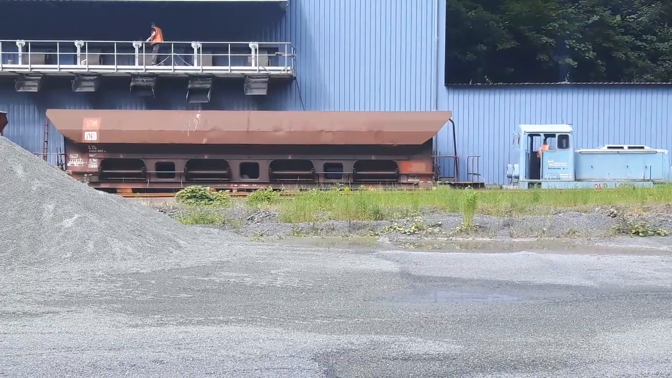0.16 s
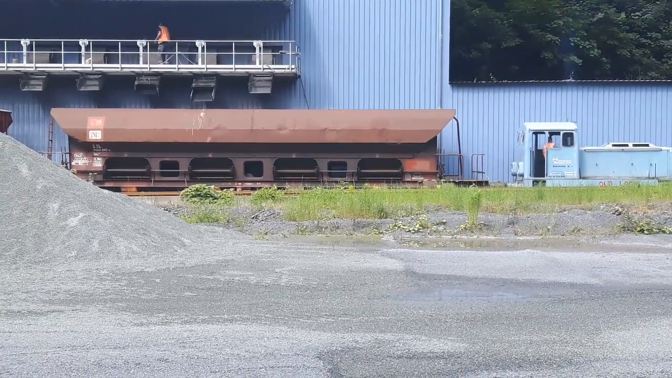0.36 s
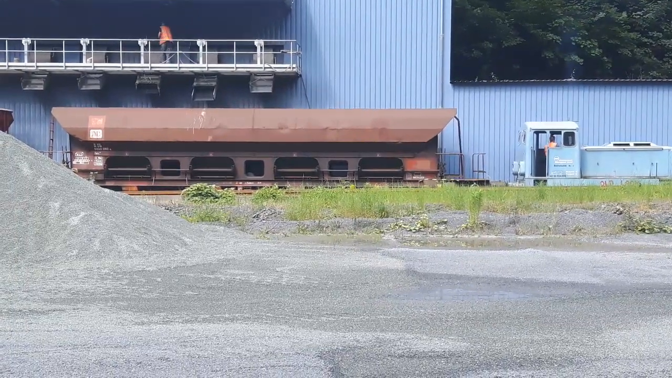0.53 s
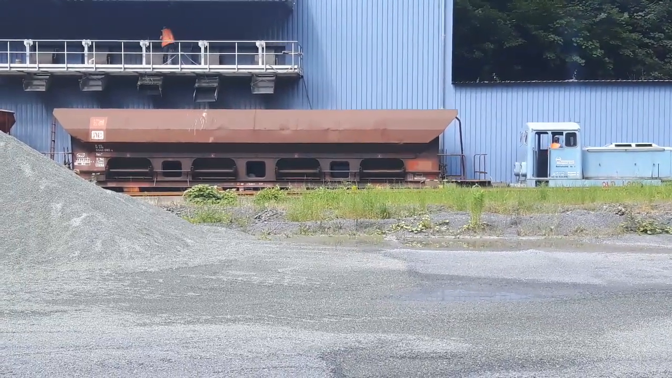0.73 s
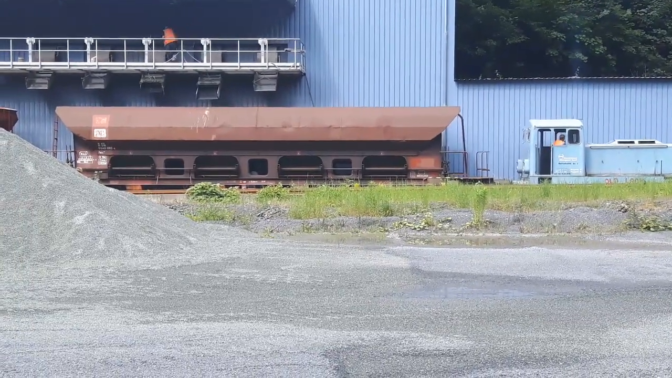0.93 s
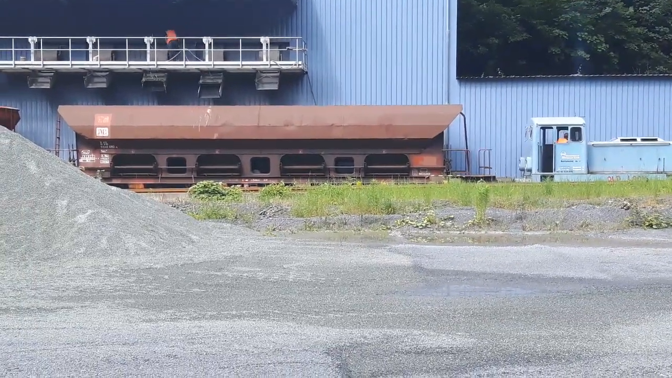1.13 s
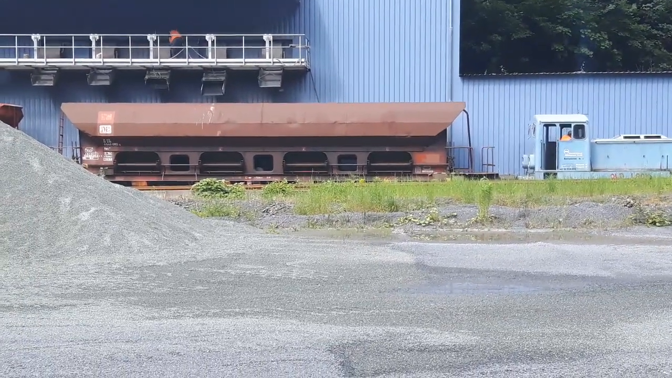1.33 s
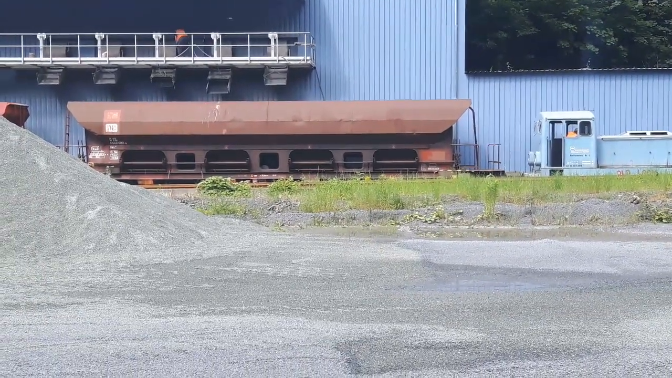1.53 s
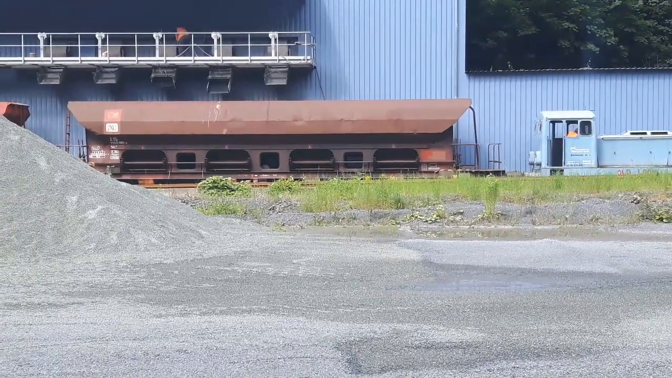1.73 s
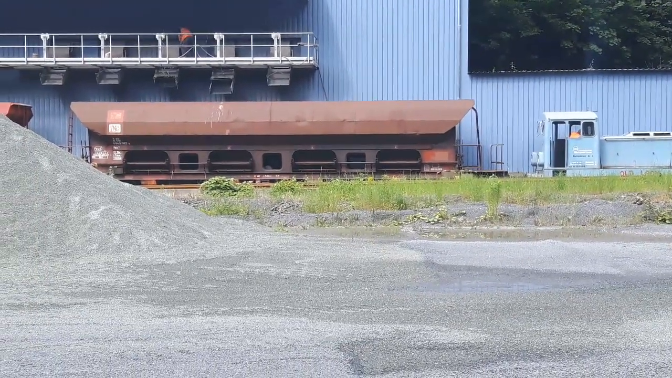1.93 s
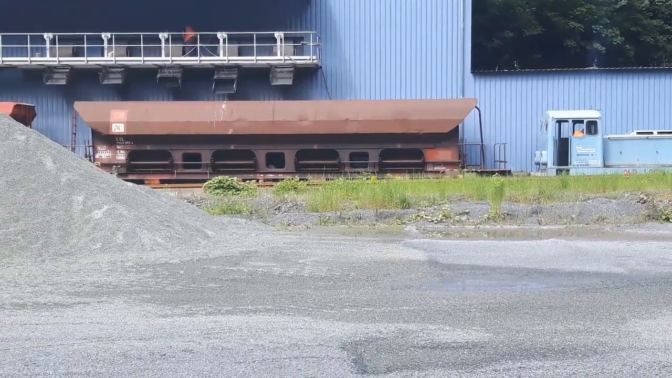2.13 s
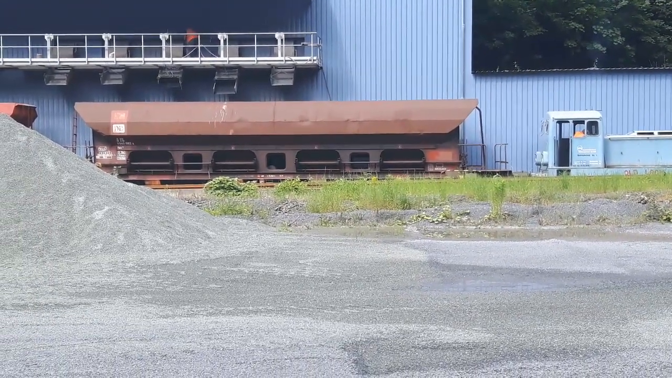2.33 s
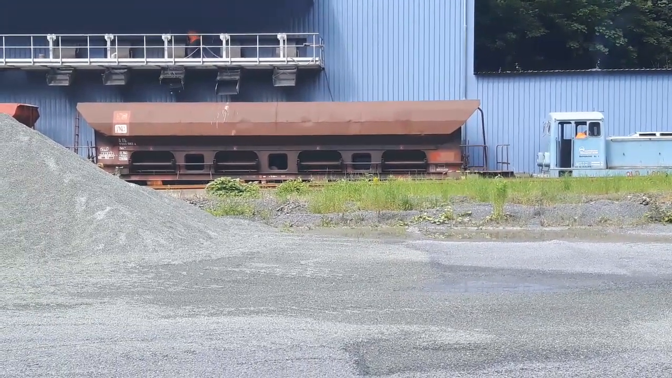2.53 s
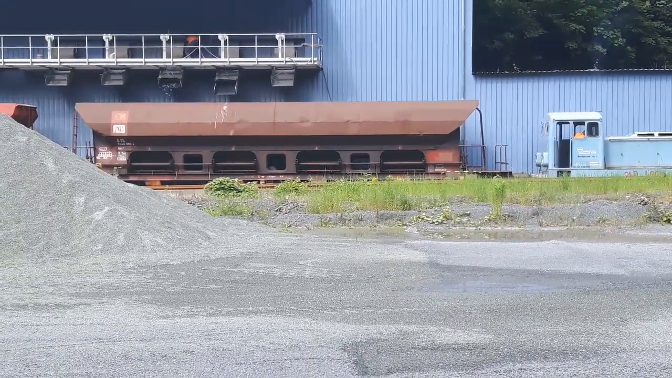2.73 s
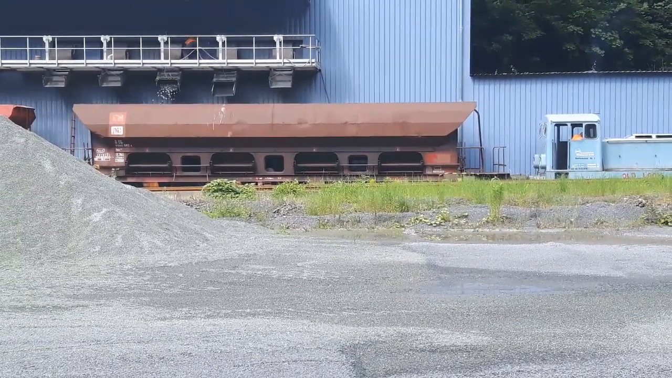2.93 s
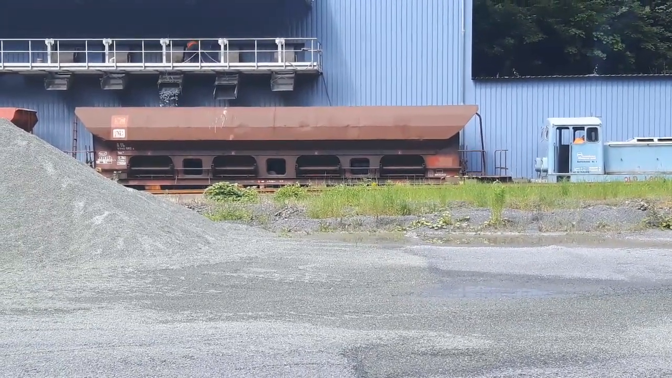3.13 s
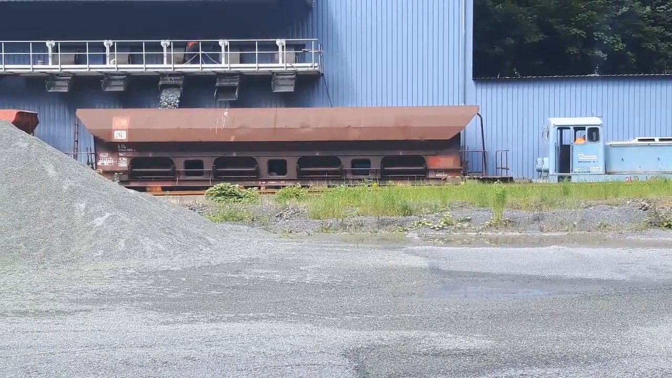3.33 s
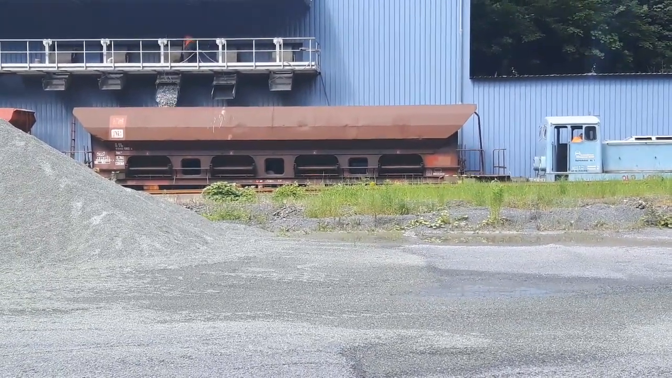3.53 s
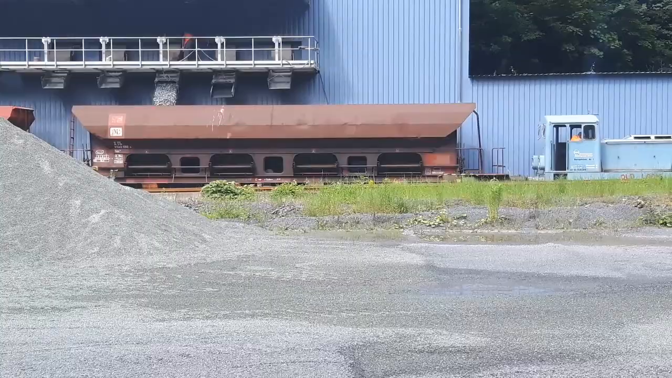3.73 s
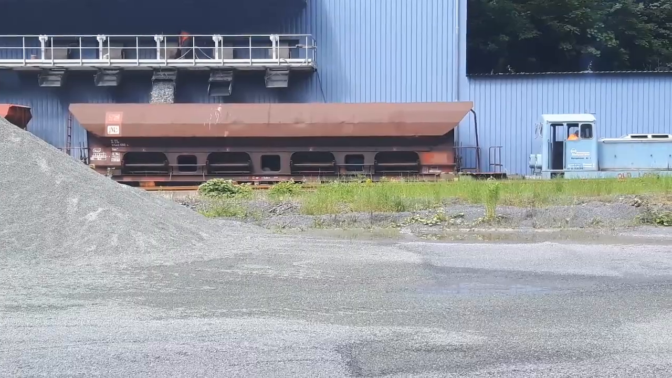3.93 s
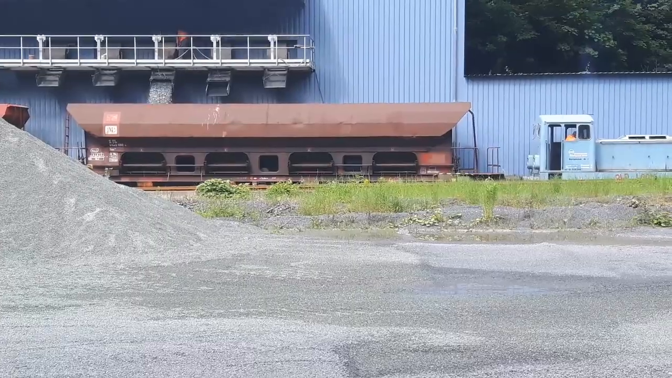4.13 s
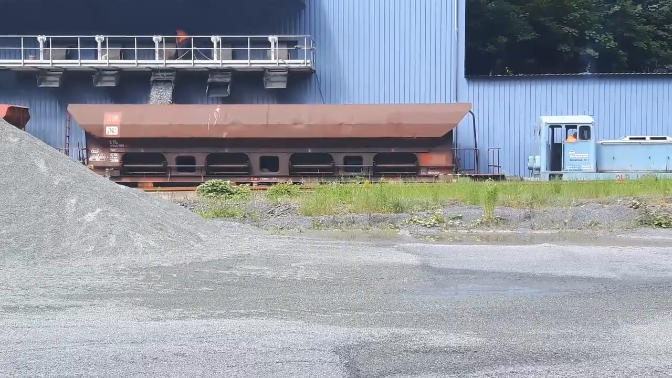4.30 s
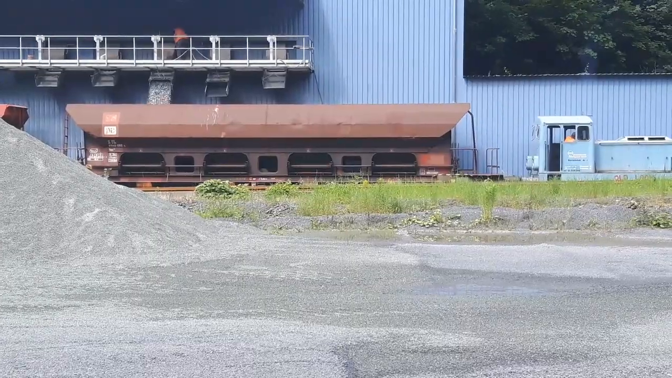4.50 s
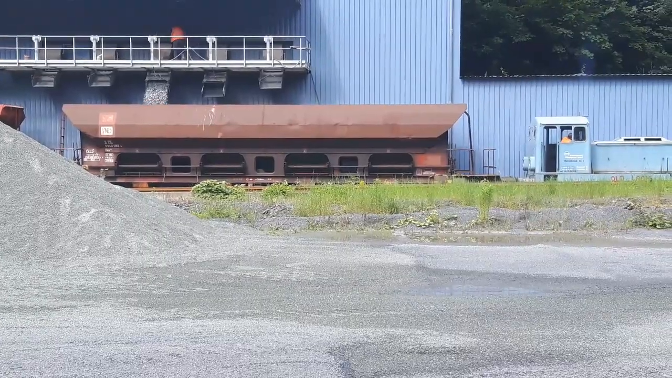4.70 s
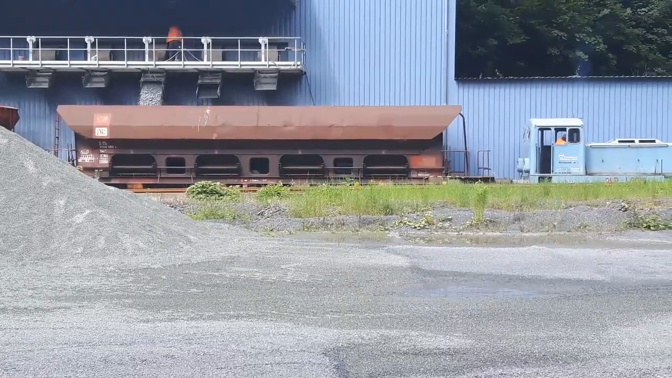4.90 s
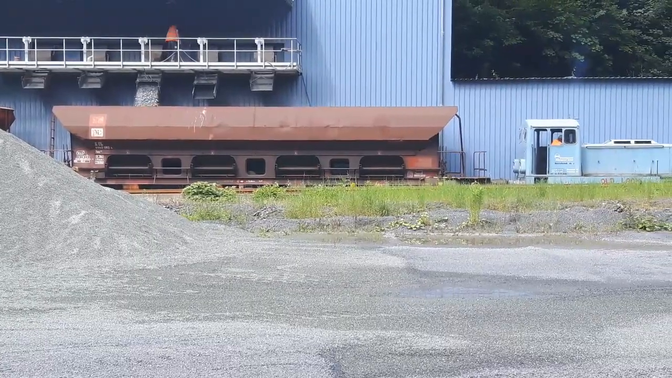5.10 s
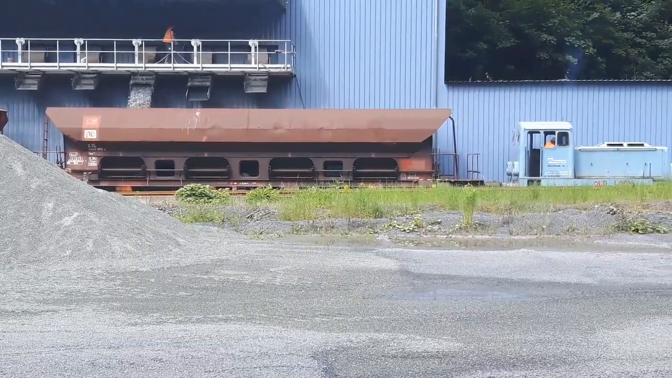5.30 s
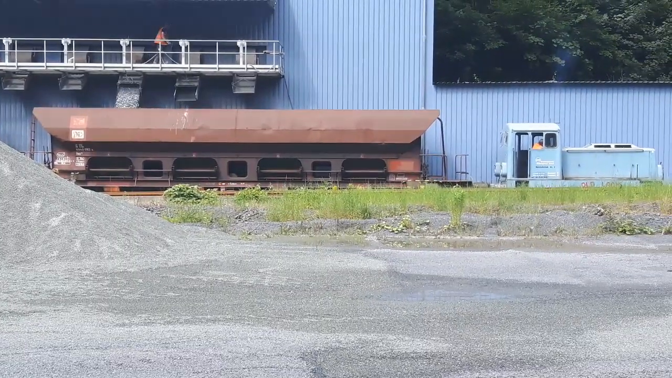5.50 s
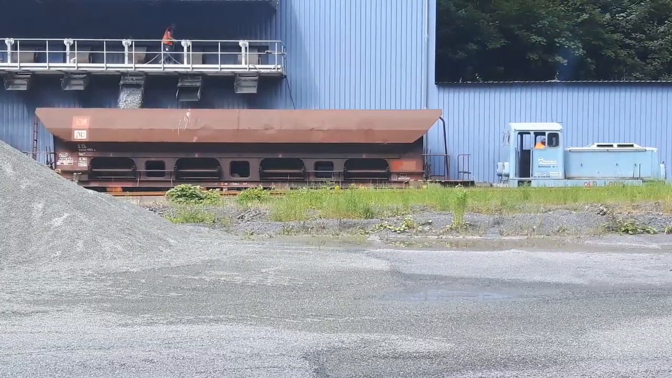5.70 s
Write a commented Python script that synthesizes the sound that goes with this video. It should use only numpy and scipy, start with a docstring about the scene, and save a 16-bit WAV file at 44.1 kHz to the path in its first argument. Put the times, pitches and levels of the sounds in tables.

```python
"""Crushed stone runs from a chute into a steel hopper wagon at a quarry loading plant, far off, straight ahead.
It trickles at first, then a gate opens and it pours: random impacts crack stone on stone, clatter on the
plates and ring the hopper's resonances into a boom. A small diesel locomotive idles beside it, uneven pulses
through an exhaust filter, its firing tone beating slowly against the plant's hum over a wash of machinery.
The shed wall answers across the yard as a diffuse tail of filtered noise."""
import sys
import numpy as np
from scipy import signal
from scipy.fft import rfft, irfft, next_fast_len
from scipy.io import wavfile
from scipy.ndimage import map_coordinates

SR = 44100
rng = np.random.default_rng(int(sys.argv[2]) if len(sys.argv) > 2 else 0)


def unload_audio(sound):
    """Save the sound as a 16-bit wav file, at the path given as the first command line argument."""
    columns = np.transpose(np.atleast_2d(sound))
    # keep every value between -1 and 1, then stretch to whole-number steps
    steps = np.round(np.clip(columns, -1, 1) * 32767)
    wavfile.write(sys.argv[1], SR, steps.astype(np.int16))


N = 253575
TIME = np.arange(N) / SR  # s

# Most table levels are relative to their source's gain; engine tones, shudder and hum are set directly.
# exhaust pulse strength of each cylinder in firing order: [level/dB]
CYLINDER_LEVELS = [2.5, 3, -2, -3.5, 1, -4.5]
# spectrum of the exhaust puffs: [f/Hz, level/dB]
EXHAUST_SPECTRUM = [(25, -56), (42, -17), (58, -1), (95, -3.5), (150, -3.5), (230, -3.5), (295, -7),
                    (350, -8.5), (450, -28), (700, -14), (1500, -56)]
# spectrum of the engine's low roar: [f/Hz, level/dB]
ROAR_SPECTRUM = [(20, -36), (38, -30), (60, 0), (100, 10.5), (170, 4), (290, 10.5), (350, 3), (450, -4),
                 (700, -45)]
# decay of the shed wall's answer: [f/Hz, t60/s]
SHED_DECAY = [(100, 0.29), (1000, 1), (4000, 0.64), (14000, 0.16)]
# spectrum of the machinery wash: [f/Hz, level/dB]
YARD_SPECTRUM = [(200, -18), (470, -1), (650, -1.5), (850, -3.5), (1030, -6.5), (1750, -5), (2500, -13),
                 (3100, -21.5), (3800, -20), (5600, -25.5), (6800, -40), (10500, -50), (12800, -34),
                 (15700, -50)]
# faint wavering tones of the engine: [f/Hz, level/dB]
ENGINE_TONES = [(94, -49), (267.5, -51), (298.5, -54), (527.6, -52), (629.8, -59), (802.1, -59.5)]
# flow of the first thin stream: [t/s, level/dB]
TRICKLE_FLOW = [(2.0, -51.5), (2.3, -35), (2.42, -34.5), (2.52, -29), (3.18, -26), (3.27, -23.5)]
# clumps of stone that land together: [t/s, level/dB]
CLUMP_HITS = [(2.118, -33.5), (2.160, -27.5), (2.223, -34.5), (2.267, -27.5), (2.324, -30), (2.439, -22.5),
              (2.495, -23.5), (2.554, -27), (2.587, -28), (2.700, -26), (2.741, -25), (2.857, -23),
              (2.890, -27), (2.946, -23.5), (2.994, -22.5), (3.196, -24)]
# clatter of the trickle on the plates: [f/Hz, level/dB]
TRICKLE_CLATTER = [(300, -25.5), (480, -10), (850, -1.5), (1100, -4), (1450, 1.5), (1950, -1.5),
                   (2300, -0.5), (2800, -8.5), (3250, -6.5), (3600, -22), (5500, -29), (8000, -46)]
# stone cracking on stone in the trickle: [f/Hz, level/dB]
TRICKLE_CHIPS = [(2000, -17), (4600, -2.5), (5500, -1), (7000, 2), (8600, -4), (9600, -17), (10100, -9),
                 (11000, -22), (12200, -5), (13700, -12), (15700, -28)]
# resonances of the plates: [f/Hz, width/Hz, level/dB]
PLATE_RESONANCES = [(1380, 120, -3.5), (1755, 71, -1), (2243, 133, 4), (2685, 60, -1.5), (3120, 86, -11.5),
                    (4073, 130, -8), (4940, 130, -10)]
# low ringing of the hopper's steel walls: [f/Hz, width/Hz, level/dB]
BOOM_RESONANCES = [(116.3, 9.3, -3.5), (140, 29, -8.5), (172.7, 12.5, 1), (213.4, 12.2, 1), (241, 31, -2),
                   (290.7, 30, 0), (378, 52, -6.5)]
# higher ringing of the same walls: [f/Hz, width/Hz, level/dB]
CLANG_RESONANCES = [(566, 68, -6), (630.7, 18, 1.5), (702, 45, -2), (757, 32, 1), (819, 41, 0),
                    (919.4, 30, 0), (1008, 41, -6.5)]
# resonances of the wagon's frame: [f/Hz, width/Hz, level/dB]
FRAME_RESONANCES = [(63, 9, -5), (76.7, 6.6, 2), (88, 12, -2.5)]
# the frame shudders late in the pour: [hold from t/s, hold until t/s, level/dB, rise/dB per s, fall/dB per s]
FRAME_SHUDDER = (5, 5.2, -30, 20, 18)
# a low hum swells briefly and fades: [hold from t/s, hold until t/s, level/dB, rise/dB per s, fall/dB per s]
HUM_SWELL = (4.06, 4.12, -16.5, 100, 95)
# flow through the open gate: [t/s, level/dB]
GATE_FLOW = [(3.47, -24.5), (3.67, -15), (4.37, -15), (4.78, -16), (5.16, -19.5), (5.31, -17), (5.5, -19.5),
             (5.63, -26.5), (5.75, -24.5)]
# slugs that crack off the chute lip, then land: [t/s, crack level/dB, crack t60/s, landing level/dB]
SLUGS = [(3.262, -20, .42, -18.5), (3.468, -31, .4, -23), (3.545, -21, 0.27, -22), (3.624, -21, .4, -21.5),
         (4.2, -24, 0.5, -28), (4.335, -23, .3, -25), (5.205, -22, 0.42, -33), (5.335, -21, .15, -38),
         (5.49, -26, 0.14, -30)]
# clatter of the pour on the plates: [f/Hz, level/dB]
POUR_CLATTER = [(60, -62), (300, -20.5), (520, -8), (900, -9), (1130, -4), (1330, -1.5), (1800, 0.5),
                (2000, -4), (2350, -5), (2850, -5.5), (3250, -7), (3600, -16.5), (5500, -22.5),
                (8000, -38.5)]
# stone cracking on stone in the pour: [f/Hz, level/dB]
POUR_CHIPS = [(2000, -27), (4000, -11.5), (5550, -4), (6100, 1), (7200, -3), (8500, -7), (9600, -15),
              (10100, -13.5), (11000, -15.5), (12100, -4), (13400, -7.5), (15700, -22.5)]

CYCLE_HZ, PLANT_HZ = 18.73, 111.18  # engine cycle and plant hum
FIRING_HZ = CYCLE_HZ * len(CYLINDER_LEVELS)
FULL_DB = -15  # flow level that counts as full
FALL_S = 0.063  # a slug lands hardest this long after it leaves the lip
SLUG_ATTACK_S, CLUMP_ATTACK_S = 0.003, 0.0007  # time constants of arrival
TOP_HZ = 15750  # band limit of the recorder


def amp(db):
    """Decibels to gain."""
    return 10 ** (np.asarray(db) / 20)


def unit(x):
    """Scale to rms 1."""
    return x / np.sqrt(np.mean(x ** 2) + 1e-20)


def along(points, hz):
    """Interpolate (f/Hz, value) points on a log frequency axis."""
    f, value = np.transpose(points)
    return np.interp(np.log(hz + 1), np.log(f + 1), value)


def wobble(rate):
    """A smooth random curve with rate knots a second."""
    knots = rng.standard_normal(int(N * rate / SR) + 4)
    return map_coordinates(knots, [TIME * rate])


def filtered(x, response):
    """Multiply the spectrum of x by a complex response of frequency, zero-padded."""
    size = 2 * next_fast_len((N + SR) // 2)
    return irfft(rfft(x, size) * response(np.fft.rfftfreq(size, 1 / SR)), size)[:N]


def highpassed(x, corner_hz):
    """Take away what lies below a steep corner."""
    return filtered(x, lambda hz: hz ** 8 / (hz ** 8 + corner_hz ** 8))


def coloured(x, spectrum):
    """Pass x through a causal, minimum-phase filter with the given spectrum, at rms 1."""
    def response(hz):
        # folding the cepstrum forward in time makes the filter causal
        cepstrum = irfft(np.log(amp(along(spectrum, hz))))
        half = len(cepstrum) // 2
        cepstrum[1:half] *= 2
        cepstrum[half + 1:] = 0
        return np.exp(rfft(cepstrum))
    return unit(filtered(x, response))


def rung(x, modes):
    """Ring a set of resonances with x, alternating in sign, at rms 1."""
    def response(hz):
        total = 0
        for k, (centre, width, db) in enumerate(modes):
            damping = 1j * hz * width
            total = total + (-1) ** k * amp(db) * damping / (centre * centre - hz * hz + damping)
        return total
    return unit(filtered(x, response))


def level(rows):
    """One gain per sample from (t/s, level/dB) rows, silent before a 4 ms rise into the first."""
    s, db = np.transpose(rows)
    opening = np.clip((TIME - s[0]) / 0.004 + 1, 0, 1)
    return amp(np.interp(TIME, s, db)) * opening


def follows(flow, power):
    """A gain that is 1 at full flow and grows as a power of the flow."""
    return (flow / amp(FULL_DB)) ** power


def lagged(gain, lag_s):
    """A level in dB that creeps after the given one."""
    db = 20 * np.log10(gain + 1e-3)
    keep = np.exp(-1 / (lag_s * SR))
    return amp(db[0] + signal.lfilter([1 - keep], [1, -keep], db - db[0]))


def swell(start_s, end_s, db, rise, fall):
    """An envelope that rises, holds from start to end and falls, at its own dB per second."""
    before, after = np.maximum(start_s - TIME, 0), np.maximum(TIME - end_s, 0)
    return amp(db - rise * before - fall * after)


def burst(s, db, t60, attack_s):
    """An envelope that rises quickly from s and dies away."""
    age = np.maximum(TIME - s, 0)
    return amp(db - 60 * age / t60) * (1 - np.exp(-age / attack_s))


def stones(rate, spread_db, bunch_db):
    """Random impacts of unequal stones, about rate a second, arriving in bunches, at rms 1."""
    hits = rng.poisson(rate / SR, N)
    size = amp(spread_db * np.clip(rng.standard_normal(N), -2, 2))
    sign = rng.choice([-1, 1], N)
    return unit(np.sqrt(hits) * size * sign * amp(bunch_db * wobble(90)))


def sharpened(x, force, sharpness):
    """Scale impacts by force; harder blows are shorter, so the top treble grows faster."""
    top = highpassed(x, 9500)
    hardness = np.minimum(unit(force) / 1.75, 2) ** sharpness
    return force * (x + top * (hardness - 1))


def shed(x, wet_db):
    """Add the diffuse answer of the shed wall; the middle lingers longest and the paths drift."""
    hz, t, noise = signal.stft(rng.standard_normal((2, SR // 2)), SR, nperseg=256)
    fade = amp(-60 * t / along(SHED_DECAY, hz)[:, None])
    fade = fade / np.sqrt(np.mean(fade ** 2, axis=1, keepdims=True))  # equal energy in every band
    tails = signal.istft(noise * fade, SR, nperseg=256)[1]
    first, second = [signal.fftconvolve(x, tail / np.linalg.norm(tail))[:N] for tail in tails]
    drift = 2 * wobble(2.001)
    wet = np.cos(drift) * first + np.sin(drift) * second
    return (x + amp(wet_db) * wet) / np.hypot(1, amp(wet_db))


def engine(pulse_db, rumble_db, scatter_db, throb):
    """Uneven cylinders puff through the exhaust; the engine's roar swells once a cycle."""
    count = int(N / SR * FIRING_HZ)
    when = (np.arange(count) + 0.02 * rng.standard_normal(count)) / FIRING_HZ
    size = amp(np.resize(CYLINDER_LEVELS, count) + scatter_db * rng.standard_normal(count))
    # the unevenness between firings makes the lope; the even part is the drone
    sample = np.clip(when * SR, 0, N - 1).astype(int)
    puffs = np.bincount(sample, size - size.mean(), N)
    exhaust = unit(shed(coloured(puffs, EXHAUST_SPECTRUM), wet_db=13.5))
    throbbing = 1 + throb * np.cos(2 * np.pi * CYCLE_HZ * TIME)
    roar = coloured(rng.standard_normal(N), ROAR_SPECTRUM) * throbbing
    return amp(pulse_db) * exhaust + amp(rumble_db) * roar


def drone(firing_db, octave_db, plant_db, in_step_s):
    """Firing tone and plant hum lie close together and beat; moving air makes them waver."""
    turns = 2 * np.pi * (TIME - in_step_s)  # the two tones are nearly in step at this time
    firing = FIRING_HZ * turns + 0.1 * wobble(5.13)
    plant = PLANT_HZ * turns + 0.098 * wobble(4.38)
    tones = amp(firing_db) * np.sin(firing)
    tones = tones + amp(octave_db + 4.0 * wobble(2.93)) * np.sin(2 * firing)
    tones = tones + amp(plant_db) * np.sin(plant)
    return tones * amp(2.3 * wobble(13))


def yard(level_db):
    """The machinery's wash is filtered noise; faint wavering tones of the engine are heard through it."""
    sound = amp(level_db + 0.24 * wobble(6.9)) * coloured(rng.standard_normal(N), YARD_SPECTRUM)
    for hz, db in ENGINE_TONES:
        strength = amp(db + 4 * wobble(4.06))
        sound = sound + strength * np.sin(2 * np.pi * hz * TIME + 0.36 * wobble(5.96))
    return sound


def trickle(clatter_db, ring_db, crack_db, crack_grows, clump_db, clump_crack_db):
    """A thin stream and single clumps hit the bare plates, until the pour buries them."""
    flow = level(TRICKLE_FLOW)
    lumps = sum(burst(s, db, t60=0.17, attack_s=CLUMP_ATTACK_S) for s, db in CLUMP_HITS)
    impacts = shed(stones(rate=2200, spread_db=2, bunch_db=0.5), wet_db=-5.5)
    stream = amp(clatter_db) * flow * impacts
    clumps = amp(clump_db) * lumps * stones(rate=5000, spread_db=2, bunch_db=0.5)
    blows = stream + clumps
    ring = amp(ring_db) * rung(blows, PLATE_RESONANCES)
    plates = np.std(blows) * (coloured(blows, TRICKLE_CLATTER) + ring)
    chips = coloured(shed(stones(rate=3400, spread_db=1.0, bunch_db=1.5), wet_db=-7), TRICKLE_CHIPS)
    force = np.hypot(amp(crack_db) * follows(flow, crack_grows), amp(clump_crack_db) * lumps)
    buried = np.interp(TIME, [3.4, 3.6], [1, 0])
    return buried * (plates + sharpened(chips, force, sharpness=0.25))


def landing():
    """The stone that reaches the plates: the steady flow plus each slug, spread out by its fall."""
    power = level(GATE_FLOW) ** 2
    for s, _, _, db in SLUGS:
        age = np.maximum(TIME - s, 0) / FALL_S
        power = power + (amp(db) * age * np.exp(1 - age)) ** 2
    return np.sqrt(power)


def deepened(x, split_hz, gain_db_per_s, loss_db_per_s):
    """The growing heap damps the upper modes and drives the lower ones harder."""
    filling_s = np.maximum(TIME - GATE_FLOW[0][0], 0)
    lower = filtered(x, lambda hz: 1 / (1 + (hz / split_hz) ** 8))
    return lower * amp(gain_db_per_s * filling_s) + (x - lower) * amp(-loss_db_per_s * filling_s)


def hopper(boom_db, boom_grows, boom_lag_s, clang_db, clang_grows, clang_lag_s, frame_db, trickle_db):
    """Landing stone rings the wagon's walls and shakes its frame; the big modes build up slowly."""
    load = np.hypot(landing(), amp(trickle_db) * level(TRICKLE_FLOW))
    boom = rung(stones(rate=2500, spread_db=2.0, bunch_db=0.4), BOOM_RESONANCES)
    boom = deepened(boom, split_hz=235, gain_db_per_s=1.1, loss_db_per_s=2.0)
    low = amp(boom_db) * follows(lagged(load, boom_lag_s), boom_grows) * boom
    shake = np.hypot(amp(frame_db) * load, swell(*FRAME_SHUDDER))
    frame = shake * rung(stones(rate=990, spread_db=1.5, bunch_db=2.0), FRAME_RESONANCES)
    clang = amp(clang_db) * follows(lagged(load, clang_lag_s), clang_grows)
    walls = clang * rung(stones(rate=3500, spread_db=1.5, bunch_db=0.1), CLANG_RESONANCES)
    # the walls are too small to radiate deep bass
    return highpassed(low + frame, 52) + walls


def pour(clatter_db, ring_db, crack_db, crack_grows, surge_db, flutter_db):
    """The full stream rattles on the plates while stone cracks on stone."""
    clatter = landing() * amp(flutter_db * wobble(16))
    blows = stones(rate=7000, spread_db=4.0, bunch_db=0.3)
    plates = amp(clatter_db) * coloured(shed(blows, wet_db=-8.5), POUR_CLATTER)
    ring = amp(ring_db) * rung(stones(rate=3500, spread_db=0.5, bunch_db=0.15), PLATE_RESONANCES)
    slugs = sum(burst(s, db, t60, SLUG_ATTACK_S) for s, db, t60, _ in SLUGS)
    steady = amp(crack_db) * follows(level(GATE_FLOW), crack_grows)
    force = np.hypot(steady, amp(surge_db) * slugs) * amp(0.72 * wobble(35))
    cracks = stones(rate=7000, spread_db=0.5, bunch_db=0.74) + 0.5 * blows
    chips = coloured(shed(cracks, wet_db=-11.5), POUR_CHIPS)
    return clatter * (plates + ring) + sharpened(chips, force, sharpness=0.29)


def low_hum(hz):
    """A low, slightly wavering sine swells briefly during the pour and fades."""
    return swell(*HUM_SWELL) * np.sin(2 * np.pi * hz * TIME + 0.27 * wobble(16))


def scene():
    """All sources lie far off, straight ahead, and sum to one channel."""
    idle = engine(pulse_db=-36.5, rumble_db=-36.0, scatter_db=1.9, throb=0.14)
    beating = drone(firing_db=-36.5, octave_db=-44.5, plant_db=-33.5, in_step_s=0.6)
    works = yard(level_db=-43)
    thin = trickle(clatter_db=-1.0, ring_db=-13.5, crack_db=-30, crack_grows=1.22,
                   clump_db=-2.0, clump_crack_db=-25)
    wagon = hopper(boom_db=-20.5, boom_grows=0.74, boom_lag_s=0.088,
                   clang_db=-21, clang_grows=0.7, clang_lag_s=0.096,
                   frame_db=-29, trickle_db=-8.5)
    full = pour(clatter_db=-0.5, ring_db=-5.5, crack_db=-22.5, crack_grows=0.9,
                surge_db=0.5, flutter_db=0.5)
    return idle + beating + works + thin + wagon + full + low_hum(hz=112.16)


def record(dry):
    """The recorder rounds off the tallest peaks, cuts above its band limit and writes both channels alike."""
    rounded = dry / (1 + np.abs(dry / 0.9) ** 8) ** (1 / 8)
    mono = filtered(rounded, lambda hz: hz < TOP_HZ)
    return np.array([mono, mono])


dry = scene()
out = record(dry)
unload_audio(out)
```